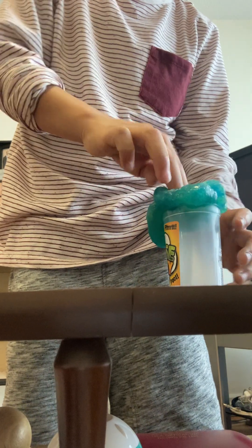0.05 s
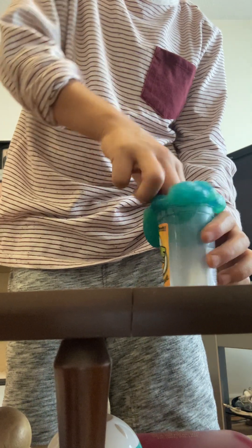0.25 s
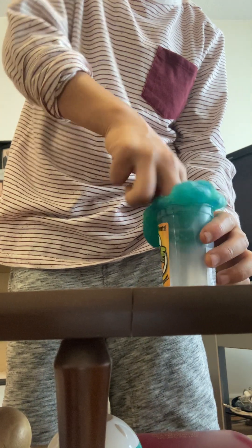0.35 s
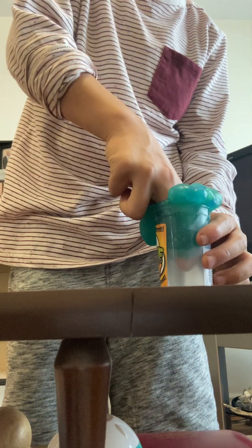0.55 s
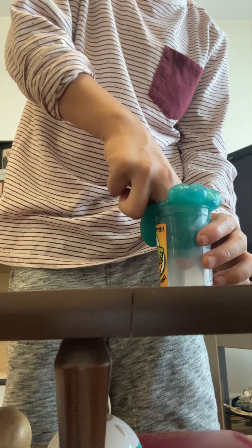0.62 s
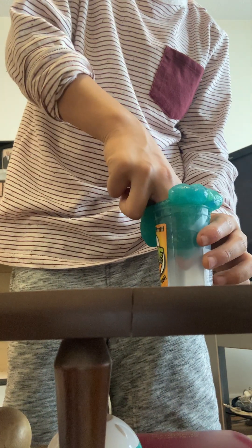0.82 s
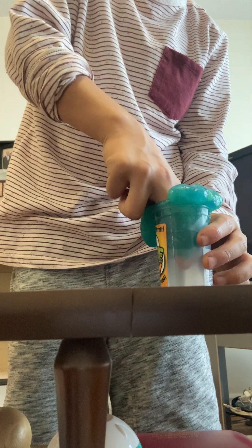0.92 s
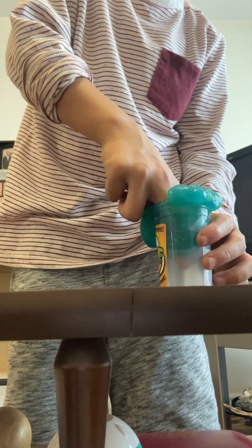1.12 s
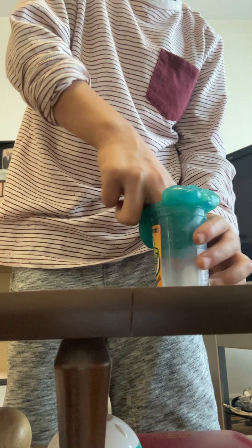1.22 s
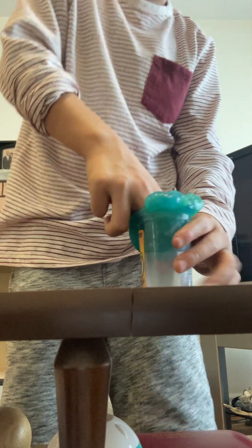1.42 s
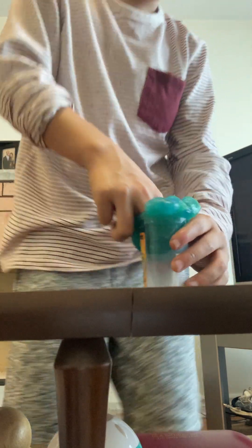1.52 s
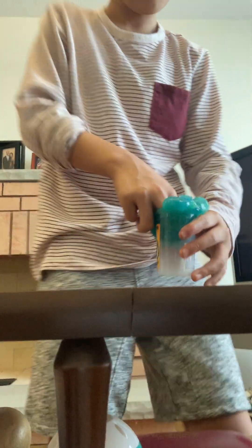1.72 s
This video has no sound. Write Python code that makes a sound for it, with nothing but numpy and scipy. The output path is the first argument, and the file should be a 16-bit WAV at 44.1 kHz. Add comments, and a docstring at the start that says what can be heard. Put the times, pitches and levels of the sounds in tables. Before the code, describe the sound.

Slime squelching and crackling as fingers push it into a plastic jar.

```python
"""Slime pushed into a jar

A plastic jar on a table in a quiet room, close to a stereo microphone. Fingers push slime down:
trapped air hisses and crackles out past it, spits, and bursts in tiny bubbles of rising pitch,
while gulps ring the hollow of the jar. A second later the jar is shifted with a soft, hollow
scrape that ends in a small squish."""
import sys
import numpy as np
from scipy import signal
from scipy.fft import rfft, irfft
from scipy.io import wavfile

SR = 44100
rng = np.random.default_rng(int(sys.argv[2]) if len(sys.argv) > 2 else 0)


def unload_wav(signal):
    """Save mono or channel-first audio to the path in sys.argv[1] as 16-bit WAV at rate SR, clipped to [-1, 1]."""
    wavfile.write(
        sys.argv[1],
        SR,
        np.round(np.clip(np.atleast_2d(signal).T, -1, 1) * 32767).astype(np.int16),
    )


N = 77175

# air escaping past the slime (time [s], level [dB])
HISS_LEVEL = [(.11, -83.5), (.144, -51.5), (.18, -47), (.225, -41.5), (.26, -40), (.295, -47), (.314, -54),
              (.355, -48.5), (.39, -61), (.415, -54), (.428, -56.5), (.465, -50.5), (.5, -56.5),
              (.56, -60.5), (.62, -100)]
# tone of the hiss (frequency [Hz], level [dB])
HISS_SPECTRUM = [(1000, -24.5), (3300, -6), (4600, -9.5), (6300, -3.5), (8000, -4.5), (10400, -3),
                 (13000, -7.5), (16000, 0.5)]
# wet crackle, following the push of the fingers (time [s], level [dB])
CRACKLE_LEVEL = [(.11, -78.5), (.18, -62.5), (.24, -45), (.29, -41.5), (.32, -46.5), (.36, -35),
                 (.41, -48.5), (.44, -47), (.495, -46), (.535, -83)]
# tone of the crackle (frequency [Hz], level [dB])
CRACKLE_SPECTRUM = [(300, 6.5), (550, -3.5), (780, 9.5), (1250, 5), (1800, -5), (2500, 0), (3400, -4),
                    (6000, -16), (14000, -24.5)]
# jets of air (time [s], band centre [Hz], level [dB], half-length [ms])
AIR_SPITS = [(.128, 4174, -61, 6), (0.229, 11500, -36.5, 2), (0.237, 12000, -39.5, 2.2),
             (0.252, 11000, -34, 1), (0.26, 11000, -39, 2), (0.3043, 9000, -39, 1),
             (0.3273, 10400, -24, 0.72), (.3405, 8500, -31, 1), (0.3499, 8500, -33.5, 1),
             (.3655, 3500, -27, .25), (.3824, 12000, -31.5, .25), (.4005, 12000, -33, .3),
             (0.4127, 8000, -33, .25), (0.4172, 8980, -18.5, .17), (0.437, 1700, -34, .4),
             (0.4641, 10000, -36, .5), (.4675, 10000, -35.5, 1), (.4972, 1210, -36.5, .6),
             (1.372, 7400, -58.5, 1.8), (1.4745, 4200, -66.5, 4)]
# bursting bubbles (time [s], starting pitch [Hz], peak [dB], decay [ms], rise [octaves/ms])
BUBBLE_POPS = [(.3387, 6500, -45, .8, .3), (0.348, 5200, -34, 0.61, .2), (.3622, 5200, -36.5, 1, .25),
               (0.3649, 2313, -20.5, 1.2, .05), (.3755, 2500, -23.5, .9, .25), (.378, 4600, -38.5, .7, .4),
               (0.4144, 5530, -32.5, .8, .17), (0.4365, 5040, -20, 0.68, .33), (0.4609, 6080, -41, .9, .35),
               (0.4776, 2050, -32, 1.44, .55), (0.489, 7600, -31.5, 0.24, .5),
               (0.4955, 5150, -21.5, 0.15, .1), (.4978, 6520, -17.5, 0.14, .3)]
# gulps of air (time [s], starting pitch [Hz], peak [dB], decay [ms])
AIR_GULPS = [(0.1949, 205, -46, 8), (0.2018, 219.7, -31.5, 17), (.239, 260, -31, 4.5),
             (0.2494, 190, -35, 6), (0.2575, 179, -28, 7), (0.2716, 157, -30.5, 10),
             (0.2987, 270, -32.5, 9), (0.3424, 330, -29, 8), (0.3608, 210.7, -27.5, 8),
             (.379, 288.4, -22, 4.5), (0.3962, 270, -21, 3.6), (0.4157, 255, -21.5, 4.5),
             (0.4437, 140, -31.5, 12), (0.464, 310, -29, 6), (0.4993, 299.2, -30, 4),
             (0.5565, 413, -45.5, 7), (1.400, 490, -54, 8), (1.475, 438, -44.5, 12)]
# modes of the jar on the table (frequency [Hz], relative level [dB], time to fall 60 dB [s])
JAR_MODES = [(53.5, -11, 0.11), (112, -10.5, .21), (138.5, -12, .1), (220, 4.5, 0.098), (346.2, -10, 0.2),
             (542.6, -10, .14)]
# hands bumping the jar (time [s], level [dB])
BUMP_LEVEL = [(0, -58.5), (.15, -59), (.23, -49.5), (.27, -41.5), (.32, -56), (.37, -45), (.515, -46),
              (.56, -50.5), (.645, -67.5), (.82, -62.5), (1.0, -70.5), (1.62, -57.5), (1.75, -65)]
# tone of the bumps (frequency [Hz], level [dB])
BUMP_SPECTRUM = [(25, -6), (50, 8), (75, -2.5), (120, 2.5), (170, -12.5), (230, -6.5), (350, -8),
                 (550, -13.5), (900, -24.5), (2000, -50.5)]
# the jar sliding on the table (time [s], level [dB])
SCRAPE_LEVEL = [(1.18, -89.5), (1.22, -66.5), (1.26, -58.5), (1.35, -50), (1.405, -50), (1.455, -56),
                (1.478, -50), (1.515, -64.5), (1.61, -62), (1.68, -75)]
# tone of the scrape (frequency [Hz], level [dB])
SCRAPE_SPECTRUM = [(60, -14.5), (120, 3), (250, 0), (370, 6), (490, 5.5), (750, 2.5), (1000, 4.5),
                   (1270, -4), (1550, -15), (2100, -17.5), (3000, -16), (4200, -19), (5200, -36.5),
                   (8500, -26.5), (15000, -33.5)]
# resonances of the sliding jar (frequency [Hz], bandwidth [Hz], relative level [dB])
SCRAPE_MODES = [(520, 75, -6), (1268, 55, -8.5), (1583, 47, -16), (1940, 97, -24.5), (4200, 140, -35.5),
                (6500, 300, -25.5), (8450, 670, -25.5)]
# fingers on the sticky jar (time [s], level [dB])
RUSTLE_LEVEL = [(1.21, -100), (1.245, -68), (1.3, -80), (1.36, -72), (1.43, -71), (1.54, -75),
                (1.63, -75.5), (1.69, -89.5)]
# tone of the rustle (frequency [Hz], level [dB])
RUSTLE_SPECTRUM = [(2000, -10.5), (5000, -5.5), (7000, -1.5), (9200, 0), (11500, -2.5), (15000, -9)]
# faint squeaks (time [s], pitch [Hz], level [dB], half-length [s])
FAINT_SQUEAKS = [(0.76, 13610, -74, .022), (.92, 13800, -75.5, 0.023), (1.125, 301.8, -68.5, 0.057),
                 (1.701, 850, -57.5, 0.026), (1.745, 13940, -61, 0.019)]
# room tone (frequency [Hz], level [dB])
ROOM_SPECTRUM = [(20, -19.5), (60, 1.5), (115, 5), (170, -2), (320, -11.5), (550, -8.5), (900, -31),
                 (3000, -33.5), (6000, -29), (10000, -25), (15000, -28.5)]
# direct sound at the microphone (frequency [Hz], phase of left minus right [rad])
MIC_PHASE = [(50, -2.5), (85, -2), (130, -1.7), (220, -0.8), (450, -1.5), (700, -2.5), (1800, -5),
             (3400, -3.5), (4800, -6)]
# stereo balance (frequency [Hz], level of left minus right [dB])
MIC_BALANCE = [(50, 1), (85, 1.5), (130, -16.5), (220, -10.5), (550, -1), (900, 0)]


def escaping_air(flutter_per_s=320, flutter_db=5):
    """Air fizzes past the crackling slime in uneven bursts, most uneven under the hardest push."""
    push = curve(CRACKLE_LEVEL)
    hiss = colour(clicks(per_s=6500, spread_db=2.5), HISS_SPECTRUM) * curve(HISS_LEVEL)
    crackle = colour(clicks(per_s=1500, spread_db=3.5), CRACKLE_SPECTRUM) * push
    depth_db = flutter_db * np.sqrt(push / push.max())
    flutter = undb(depth_db * np.clip(wobble(flutter_per_s), -2, 2))
    return (hiss + crackle) * flutter


def spits(size=4096):
    """Short jets of air break through the slime; the shortest cover the widest band."""
    out = np.zeros(N)
    ms = (np.arange(size) - size / 2) / SR * 1000
    for at, hz, db, half_ms in AIR_SPITS:
        shape = np.exp(-.5 * (ms / half_ms) ** 2)
        jet = band(hz, octaves=0.5 / half_ms ** 0.6, size=size) * shape
        add(out, at - size / 2 / SR, undb(db) * unit(jet) * np.sqrt(np.mean(shape ** 2)))
    return out


def bubble(hz, decay_ms, rise_oct_per_ms=0.13):
    """A short ring that swells and dies; its pitch rises as the bubble opens."""
    ms = np.arange(SR // 50) / SR * 1000
    age = ms / decay_ms
    pitch = np.minimum(hz * 2 ** (rise_oct_per_ms * ms), SR / 2)
    shape = age ** 0.42 * np.exp(-age)
    return np.sin(2 * np.pi * np.cumsum(pitch) / SR) * shape / shape.max()


def pops():
    """The louder bubbles burst one by one."""
    out = np.zeros(N)
    for at, hz, db, decay_ms, rise in BUBBLE_POPS:
        add(out, at, undb(db) * bubble(hz, decay_ms, rise))
    return out


def air_pocket(at=0.42, span_s=0.088, centre_hz=3013, climb_oct_per_s=7.7, db=-40.5, count=45):
    """A pocket of air shrinks, shedding a run of small bubbles that climbs in pitch."""
    out = np.zeros(N)
    for k, (jitter, detune, strength) in enumerate(rng.standard_normal((count, 3))):
        offset_s = span_s * (k / count - .5 + 0.01975 * jitter)
        hz = centre_hz * 2 ** (climb_oct_per_s * offset_s + 0.18 * detune)
        add(out, at + offset_s, undb(db + 3 * strength) * bubble(hz, decay_ms=1.0))
    return out * swell(at, half_s=0.1716)


def foam(start_s=0.27, span_s=.17, centre_hz=5000, spread_oct=.7, db=-42.5, count=40):
    """Tiny bubbles of mixed sizes burst at random while the slime gives way."""
    out = np.zeros(N)
    times = start_s + span_s * rng.random(count)
    scatter = np.clip(rng.standard_normal((count, 2)), -2, 2)
    for at, (detune, strength) in zip(times, scatter):
        hz = centre_hz * 2 ** (spread_oct * detune)
        add(out, at, undb(db + 2 * strength) * bubble(hz, decay_ms=.4))
    return out


def gulps(pitch_sag=0.036, attack_ms=0.67, ring_db=-10.5):
    """A large air pocket swings a few cycles, sagging in pitch; jar and table ring on under it."""
    out = np.zeros(N)
    t = clock()[:SR // 3]
    ms = t * 1000
    for at, start_hz, db, decay_ms in AIR_GULPS:
        fade = np.exp(-ms / decay_ms)
        pitch = start_hz * (1 - pitch_sag * (1 - fade))
        air = fade * np.sin(2 * np.pi * np.cumsum(pitch) / SR)
        tunings = 1 + .02 * rng.standard_normal(len(JAR_MODES))
        ring = sum(undb(mode_db - 60 * t / t60) * np.sin(2 * np.pi * hz * tuning * t)
                   for (hz, mode_db, t60), tuning in zip(JAR_MODES, tunings))
        gulp = (air + undb(ring_db) * ring) * (1 - np.exp(-ms / attack_ms))
        add(out, at, undb(db) * gulp / np.abs(gulp).max())
    return out


def bumps():
    """Hands knock dully on the jar, and it settles on the table with a soft thud."""
    knocks = colour(clicks(per_s=660, spread_db=2.5), BUMP_SPECTRUM) * curve(BUMP_LEVEL)
    thud = undb(-54) * band(hz=108, octaves=.15) * swell(at=.607, half_s=0.023)
    return knocks + thud


def scrape():
    """The jar slides over the table; dense ticks of friction ring its resonances."""
    friction = clicks(per_s=5000, spread_db=-1.5)
    rings = sum(undb(db) * resonate(friction, hz, width) for hz, width, db in SCRAPE_MODES)
    return unit(colour(friction, SCRAPE_SPECTRUM) + rings) * curve(SCRAPE_LEVEL)


def fingers():
    """Fingers brush the sticky jar at the start and rustle on it as it slides."""
    rustle = colour(clicks(per_s=2200, spread_db=3.0), RUSTLE_SPECTRUM) * curve(RUSTLE_LEVEL)
    brush = undb(-69) * band(hz=9160, octaves=0.22) * swell(at=0.011, half_s=0.018)
    return rustle + brush


def squeaks(waver=0.024):
    """A few faint, thin tones, briefly held, whose pitch wavers slightly."""
    out = np.zeros(N)
    wavering_time = np.cumsum(1 + waver * wobble(per_s=1500)) / SR
    for at, hz, db, half_s in FAINT_SQUEAKS:
        flat_top = np.exp(-.5 * ((clock() - at) / half_s) ** 4)
        out += undb(db) * unit(np.sin(2 * np.pi * hz * wavering_time)) * flat_top
    return out


def reflections(x, db, t60_s=0.27, delay_s=.012):
    """Reflections reach the microphone after a delay and die away."""
    t = clock()[:SR // 2]
    tail = diffuse()[:, :len(t)] * undb(-60 * t / t60_s) * (t > delay_s)
    tail /= np.sqrt(np.sum(tail ** 2) / 2)
    return undb(db) * signal.fftconvolve(x[None], tail, axes=1)[:, :N]


def room_tone(db=-68):
    """The low rumble of the quiet room."""
    return undb(db) * colour(diffuse(), ROOM_SPECTRUM)


def diffuse(wide_below_hz=4500):
    """Noise from all round: different left and right, except in the treble."""
    mid, side = rng.standard_normal((2, N))
    side = irfft(rfft(side) * undb(over_hz([(wide_below_hz, 0), (2 * wide_below_hz, -22)])), N)
    return np.array([mid + side, mid - side])


def clicks(per_s, spread_db):
    """Random clicks of either sign; a few stray far in level from the rest."""
    fires = rng.random(N) < per_s / SR
    strength = np.minimum(rng.exponential(size=N), 4)
    return fires * undb(spread_db * strength) * np.sign(rng.standard_normal(N))


def band(hz, octaves, size=N):
    """Noise in a bell-shaped band, at rms 1."""
    freqs = np.arange(size // 2 + 1) * SR / size + 1
    bell = np.exp(-.5 * (np.log2(freqs / hz) / octaves) ** 2)
    return unit(irfft(rfft(rng.standard_normal(size)) * bell, size))


def wobble(per_s):
    """Smooth random changes with a spread near 1."""
    steps = rng.standard_normal(2000)
    return np.interp(clock() * per_s, np.arange(len(steps)), steps)


def resonate(x, hz, width_hz):
    """Ring one resonance, at rms 1."""
    return unit(signal.lfilter(*signal.iirpeak(hz, hz / width_hz, fs=SR), x))


def colour(x, rows):
    """Filter by (frequency [Hz], level [dB]) points, then scale to rms 1."""
    return unit(irfft(rfft(x) * undb(over_hz(rows)), N))


def over_hz(rows):
    """Spread (frequency [Hz], value) points over the frequency grid."""
    hz, value = np.array(rows).T
    return np.interp(np.log(np.arange(N // 2 + 1) * SR / N + 1), np.log(hz), value)


def curve(rows):
    """Gain over time from (time [s], level [dB]) points."""
    return undb(np.interp(clock(), *np.array(rows).T))


def swell(at, half_s):
    """Bell-shaped envelope."""
    return np.exp(-.5 * ((clock() - at) / half_s) ** 2)


def add(out, at, x):
    """Mix a short sound in at a time in seconds."""
    i = max(int(at * SR), 0)
    out[i:i + len(x)] += x[:N - i]


def clock():
    """Time of every sample in seconds."""
    return np.arange(N) / SR


def unit(x):
    """Scale to rms 1."""
    return x / np.sqrt(np.mean(x ** 2) + 1e-24)


def undb(db):
    """Decibels to gain."""
    return 10 ** (np.asarray(db) / 20)


def scene():
    """Slime, jar and hands up close, out of step in the two channels, with the room behind."""
    squelch = escaping_air() + spits() + pops() + air_pocket() + foam()
    jar = gulps() + bumps() + scrape() + fingers()
    rumble = room_tone()
    early = reflections(squelch, db=-17, t60_s=.06, delay_s=0.00067)  # off the table and the body
    late = reflections(squelch, db=-15.5) + reflections(jar, db=-10)
    left_shift = np.exp(1j * over_hz(MIC_PHASE) * np.array([[1], [0]]))
    direct = irfft(rfft(squelch + jar + squeaks()) * left_shift, N)
    return direct + early + late + rumble


def record(dry, low_cut_hz=32, high_cut_hz=15750):
    """At the microphone the bass leans right; the deepest rumble and the very top are cut."""
    gains = undb(over_hz(MIC_BALANCE) * np.array([[.5], [-.5]]))
    gains /= np.sqrt(np.mean(gains ** 2, axis=0))
    leaning = irfft(rfft(dry) * gains, N)
    low_cut = signal.butter(4, low_cut_hz, "high", fs=SR, output="sos")
    high_cut = signal.ellip(10, .2, 70, high_cut_hz, fs=SR, output="sos")
    return signal.sosfilt(high_cut, signal.sosfilt(low_cut, leaning))


dry = scene()
out = record(dry)
unload_wav(out)
```